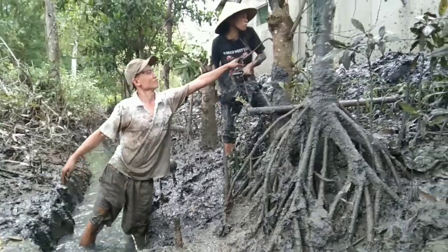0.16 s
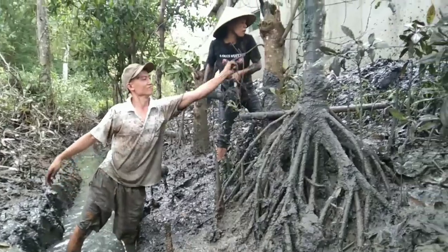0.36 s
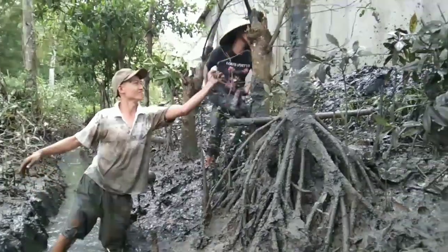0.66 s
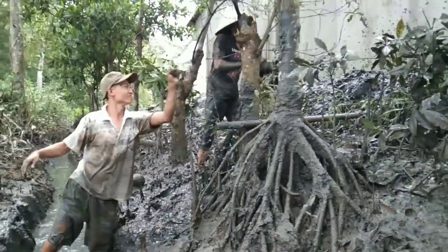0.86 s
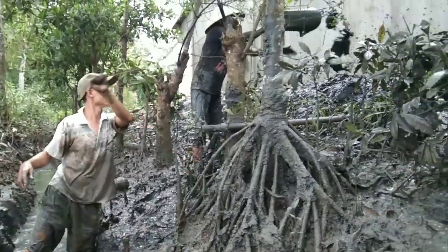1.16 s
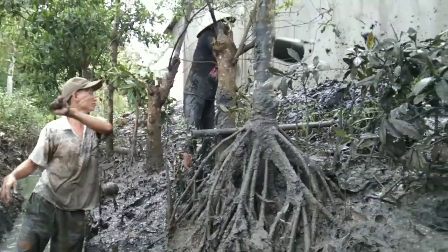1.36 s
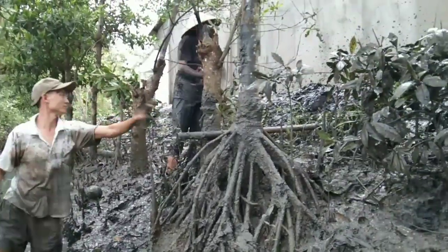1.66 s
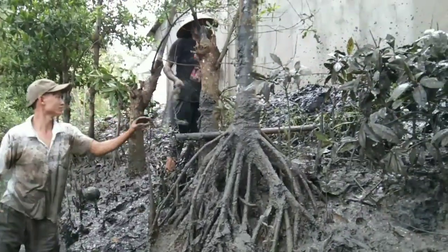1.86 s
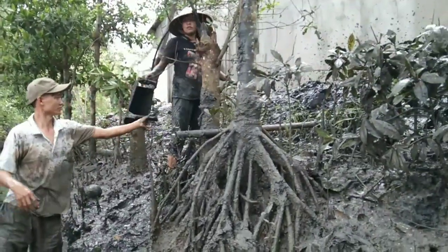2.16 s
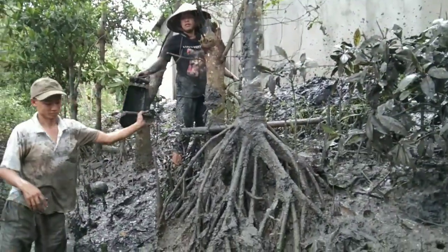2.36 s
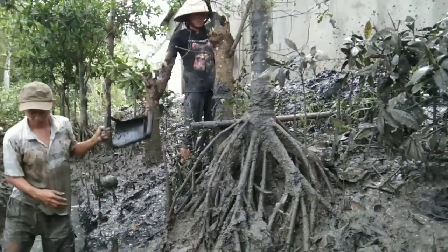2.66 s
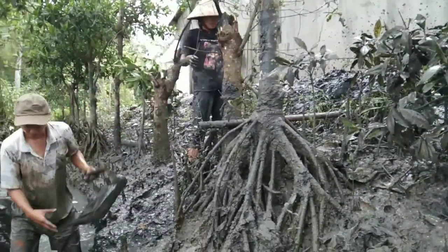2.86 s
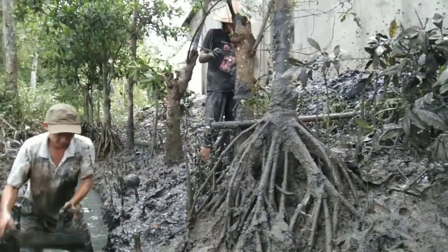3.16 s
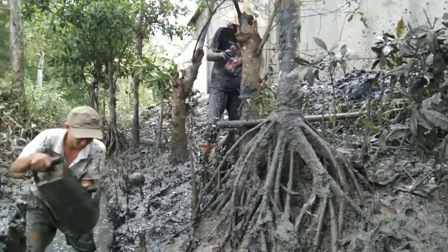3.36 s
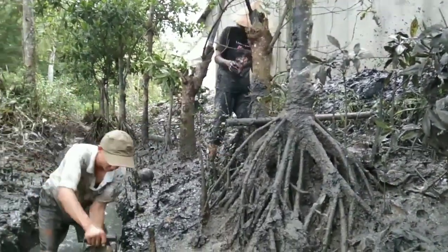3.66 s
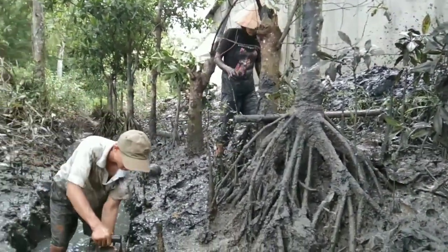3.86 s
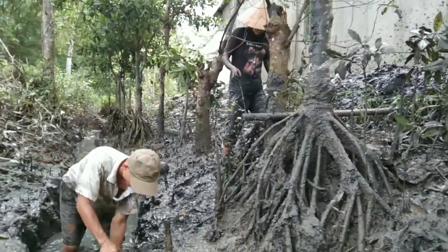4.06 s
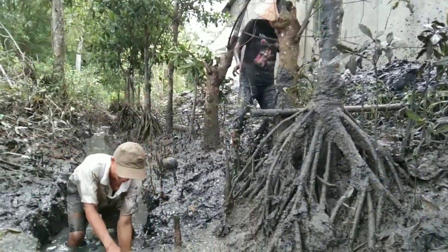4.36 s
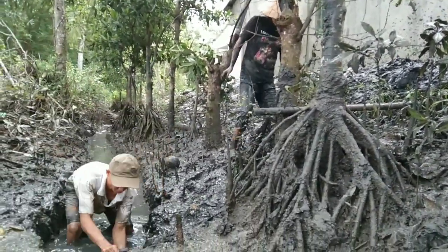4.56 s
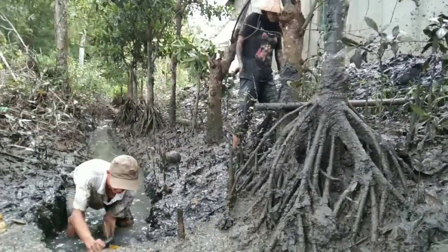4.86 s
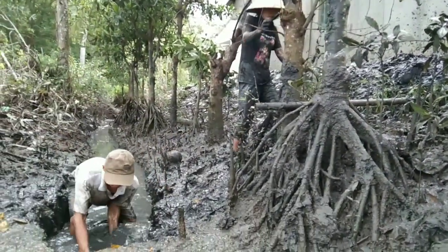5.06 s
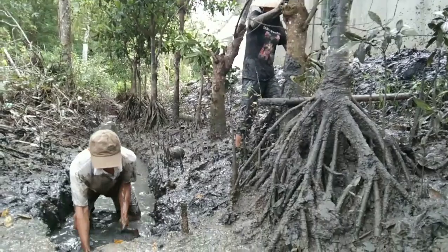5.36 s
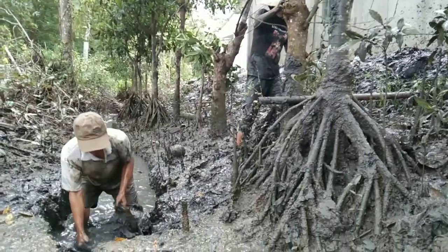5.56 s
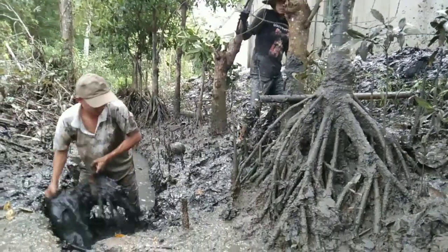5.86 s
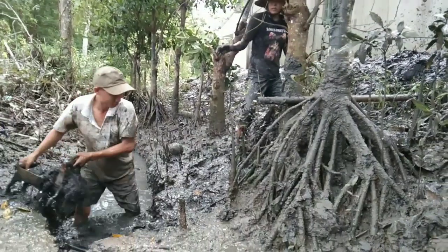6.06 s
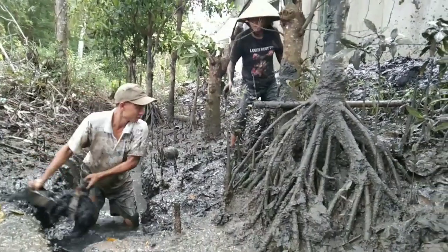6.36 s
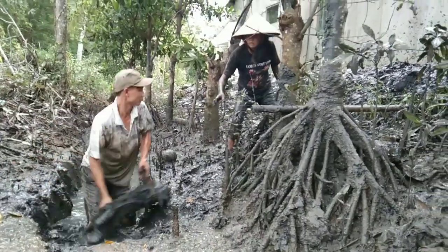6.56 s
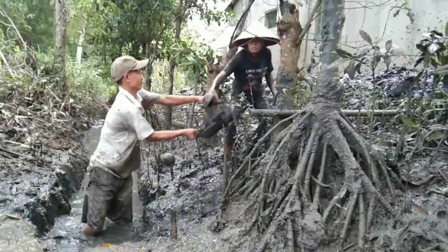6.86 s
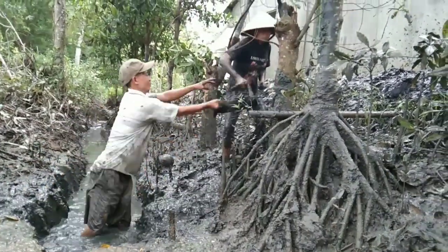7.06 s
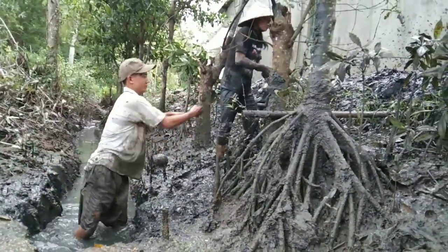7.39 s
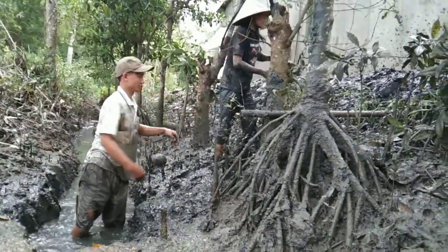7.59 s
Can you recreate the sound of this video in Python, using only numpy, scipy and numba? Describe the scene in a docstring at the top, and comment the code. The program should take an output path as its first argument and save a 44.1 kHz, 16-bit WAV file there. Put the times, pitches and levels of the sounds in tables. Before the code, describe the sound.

Muddy water sloshes, trickles and gurgles as someone wades and scoops, with sharp wet splats, plopping bubbles and a thin high insect trill outdoors.

```python
"""Wading and scooping in a muddy channel

Someone wades and scoops mud a few metres from a phone, among trees.
Swarms of ringing bubbles over noise make crackling spray, trickling water and gurgling mud; single gliding
rings plop, and noise bursts splat and tick. An insect, a modulated sine, trills in phrases
over brief hollow tones of narrow noise, a wavering low hum and a faint noise rumble."""
import sys
import numpy as np
from scipy import signal
from scipy.fft import rfft, irfft, next_fast_len
from scipy.io import wavfile
from scipy.ndimage import uniform_filter1d
from numba import njit

SR = 44100
rng = np.random.default_rng(int(sys.argv[2]) if len(sys.argv) > 2 else 0)


def to_wav(s):
    """Save 16-bit WAV."""
    ch = np.atleast_2d(s).T  # columns
    pcm = np.round(np.clip(ch, -1, 1) * 32767)  # PCM
    wavfile.write(sys.argv[1], SR, pcm.astype(np.int16))


def natural_amplitude(level_db):
    """Convert a level in decibels to a linear amplitude factor, elementwise."""
    exponent = np.asarray(level_db, float) / 20
    return 10 ** exponent


N = 340893
TIME = np.arange(N) / SR
# band edges shared by the water layers and the splats
SPRAY_HZ, TOP_HZ = 2700., 15600


@njit
def svf(x, hz, width):
    """State-variable band-pass, gain 1 at the centre."""
    y, b, l = np.empty(len(x)), 0., 0.
    g, k = np.tan(np.pi * hz / SR), width / hz
    for i in range(len(x)):
        v = (b + g * (x[i] - l)) / (1 + g * (g + k))
        b, l, y[i] = 2 * v - b, l + 2 * g * v, k * v
    return y


@njit
def rings(s, hz, t60, size, glide, rise):
    """Dying tones that swell over rise cycles; pitch climbs by the share glide over each t60."""
    out = np.zeros(N)
    for k in range(len(s)):
        start, n, phase = int(s[k] * SR), t60[k] * SR, 0.
        for i in range(min(int(n), N - start)):
            phase += 2 * np.pi * hz[k] * (1 + glide[k] * i / n) / SR
            swell = min(phase / (2 * np.pi * rise), 1.)
            out[start + i] += size[k] * np.sin(phase) * swell * 1000. ** (-i / n)
    return out


def level(x, db):
    """Set the rms in dB."""
    return x * natural_amplitude(db) / np.sqrt(np.mean(x ** 2))


def noise():
    """White noise."""
    return rng.standard_normal(N)


def walk(rate):
    """Random levels held 1 / rate s and slewed twice."""
    k = int(SR / rate)
    held = np.repeat(rng.standard_normal(N // k + 1), k)
    return uniform_filter1d(uniform_filter1d(held, k), k)[:N]


def coloured(x, lo_hz, hi_hz):
    """One steep-edged band of x, through the colour of the bank echo and the phone's port."""
    # colour of the bank echo and the port together: (frequency [Hz], gain [dB])
    colour = [(71, -34), (120, 1.5), (240, 1.5), (300, 4), (500, 1.5), (570, -3), (645, -20), (730, -4),
              (1020, 0.5), (1490, 1), (1870, 3), (2350, -1), (2800, -7.5), (3500, -9), (4200, -1.5),
              (4700, -2.5), (5200, -6.5), (5720, -7.5), (7400, -3), (8420, -2.5), (10500, -18),
              (15500, -34)]
    port_hz, port_width_hz, port_db = 4570., 250., 3.5  # a ring of the microphone port
    n = next_fast_len(N)
    f = np.fft.rfftfreq(n, 1 / SR) + 1  # 1 Hz up, to keep off zero
    hz, db = np.transpose(colour)
    edges = 1 / np.sqrt((1 + (lo_hz / f) ** 28) * (1 + (f / hi_hz) ** 28))
    ring_db = port_db / (1 + (2 * (f - port_hz) / port_width_hz) ** 2)
    gain = edges * natural_amplitude(np.interp(np.log(f), np.log(hz), db) + ring_db)
    return irfft(rfft(x, n) * gain, n)[:N]


def swarm(count, lo_hz, hi_hz, cycles, spread_db, glide, wash_db):
    """Many random bubbles of unlike size over a wash of those too small to tell apart."""
    when, pitch, size, length = rng.random((count, 4)).T
    hz = lo_hz * (hi_hz / lo_hz) ** pitch
    t60 = cycles * (.5 + length) / hz
    grains = rings(when * N / SR, hz, t60, hz * natural_amplitude(spread_db * size ** 2), glide * length, 1.5)
    return level(grains, 0) + natural_amplitude(wash_db) * noise()


def churn():
    """Bubble swarms follow the stirring; the finest mist and the heave of mud need hard stirring."""
    # brightness of the spray, in full in the mist and in part below it: (time [s], level [dB])
    mist_level = [(0, 6), (.6, 5.5), (1.2, 2), (1.85, 5), (2.35, -5), (2.7, -4), (3.2, 3), (3.75, 1),
                  (3.9, 1), (4.3, -5), (4.65, -7), (4.9, -2), (5.3, -2), (5.6, 1), (6.9, .5), (7.1, 4),
                  (7.7, 5)]
    mist_hz, tilt_hz = 10500., 5700.
    tilt_up, tilt_down = .3, .2  # share of the brightness gained above tilt_hz, lost below
    spray_db, *others = stirring()

    # small wavelets break in clusters, heard in every band at once; a heavy run-off evens them out
    lap_db = np.clip(-.13 * (spray_db + 28), .5, 3) * walk(20)
    trickle_db, gurgle_db, hollow_db = (db + lap_db for db in others)
    spray_db = spray_db + 0.37 * lap_db + 1.5 * walk(30)

    spray = swarm(count=16000, lo_hz=2600., hi_hz=15000., cycles=30., spread_db=12., glide=.1, wash_db=5.)
    trickle = swarm(count=8000, lo_hz=780., hi_hz=2800., cycles=32., spread_db=12., glide=.1, wash_db=6.)
    gurgle = swarm(count=4000, lo_hz=110., hi_hz=800., cycles=10., spread_db=8., glide=.4, wash_db=3.)

    bright_db = np.interp(TIME, *np.transpose(mist_level))
    low = coloured(spray, SPRAY_HZ, tilt_hz)
    high = coloured(spray, SPRAY_HZ, mist_hz) - low
    scale = natural_amplitude(-2.9) / np.std(low + high)
    low_gain = natural_amplitude(1.4 * walk(14) - tilt_down * bright_db)
    high_gain = natural_amplitude(1.2 * walk(11) + tilt_up * bright_db)
    out = scale * (low * low_gain + high * high_gain) * natural_amplitude(spray_db)

    # flying drops grow less than the spray does, the mist more
    out += drops(count=500) * natural_amplitude(.55 * (spray_db + 47))
    mist_db = 1.5 * (spray_db + 43) + bright_db + 2.2 * walk(12)
    out += level(coloured(spray, mist_hz, TOP_HZ), -66.8) * natural_amplitude(mist_db)
    out += level(coloured(trickle, 884.0, SPRAY_HZ), -3.1) * natural_amplitude(trickle_db + 0.6 * walk(12))
    out += level(coloured(gurgle, 85., 574.0), -5.26) * natural_amplitude(gurgle_db)
    heave = svf(svf(noise(), 82.0, 50.), 83.0, 60.)
    out += level(heave, -56) * natural_amplitude(1.5 * (gurgle_db + 39))
    return out + level(coloured(gurgle, 597.0, 1060.0), -6.5) * natural_amplitude(hollow_db)


def stirring():
    """Drive in dB of spray, trickle, gurgle and hollow slosh: powers of slow stirring and sloshes add."""
    # slow stirring of the water by legs, scoop and run-off:
    # (time [s], spray [dB], trickle [dB], gurgle [dB], hollow slosh [dB])
    slow_stirring = [(0, -48, -51, -59, -88), (.4, -49, -50, -70, -95), (.6, -47, -48, -60, -61),
                     (.8, -47, -51, -57, -85), (.95, -47, -51, -56, -70), (1.35, -46, -50, -57, -88),
                     (1.82, -48, -49, -57, -62), (1.97, -49, -51, -55, -95), (2.3, -50.5, -50, -62, -80),
                     (2.5, -51, -51, -61, -68), (2.72, -48.5, -49.5, -61, -95), (3.0, -46.5, -50, -59, -78),
                     (3.4, -47, -50.5, -56, -64), (3.6, -50, -50.5, -60, -90), (4.3, -50, -51, -56, -62),
                     (4.55, -49.5, -50, -58, -62), (4.65, -46, -46.5, -55, -57),
                     (4.85, -45.5, -46.5, -55, -56), (5.1, -45, -43, -41, -50), (5.25, -44, -41, -38, -48),
                     (5.35, -46, -44, -50, -49), (5.65, -44, -43, -48, -51), (5.9, -36, -38, -41.5, -42),
                     (6.2, -39, -42, -53, -54), (6.45, -40, -45, -54, -65), (6.62, -47, -52, -68, -87),
                     (7.05, -45.5, -51, -56.5, -80), (7.5, -48.5, -51.5, -62, -95),
                     (7.73, -47, -55, -60, -82)]
    # single sloshes: (peak time [s], swell over 20 dB [s], fade over 20 dB [s],
    # spray [dB], trickle [dB], gurgle [dB]); times hold before the crest is rounded
    single_sloshes = [(0, .05, .08, -46, -48, -56), (.13, .08, .15, -45, -45, -55),
                      (.26, .05, .12, -44, -46, -62), (.465, .01, .11, -32, -41.5, -62),
                      (.69, .12, .25, -45, -50, -58), (1.495, .12, .12, -32, -37.5, -47),
                      (1.67, .05, .15, -33.5, -41, -46), (1.745, .02, .13, -35, -41, -47),
                      (2.18, .25, .25, -43.5, -50, -60), (3.55, .05, .25, -44, -56, -62),
                      (3.74, .11, .12, -32, -36, -44), (3.93, .08, .1, -32.5, -33.5, -38),
                      (4.08, .15, .1, -39.5, -47, -55), (4.22, .1, .12, -45, -47, -51),
                      (4.35, .02, .15, -45, -46, -55), (4.5, .1, .1, -44, -46, -59),
                      (5.04, .15, .3, -41, -42, -39), (6.02, .15, .15, -40, -41, -52),
                      (6.13, .15, .2, -36, -41, -54), (6.24, .1, .15, -34, -37, -57),
                      (6.35, .1, .08, -36, -39, -62), (6.54, .2, .2, -40, -42, -62),
                      (6.69, .06, .5, -33, -35.5, -53), (6.8, .2, .3, -36, -41, -51),
                      (7.67, .2, .3, -45.5, -58, -67)]
    hollow_under_gurgle_db, round_s = 5.5, .008  # within a slosh; rounding of its crest
    s, *slow_db = np.transpose(slow_stirring)
    power = np.array([natural_amplitude(2 * np.interp(TIME, s, db)) for db in slow_db])
    for peak_s, swell_s, fade_s, spray_db, trickle_db, gurgle_db in single_sloshes:
        near = slice(int(max(peak_s - .5, 0) * SR), int((peak_s + 1) * SR))
        t = TIME[near] - peak_s
        t = t * abs(t) / (abs(t) + round_s)
        shape = natural_amplitude(2 * 20 * np.where(t < 0, t / swell_s, -t / fade_s))
        tops_db = np.array([spray_db, trickle_db, gurgle_db, gurgle_db - hollow_under_gurgle_db])
        power[:, near] += natural_amplitude(2 * tops_db)[:, None] * shape
    return 10 * np.log10(power)


def drops(count):
    """Scattered drops tick on mud and leaves: short dying noise bursts of unlike size."""
    t60_s, spread_db = .016, 4.
    hits = np.zeros(N)
    sizes_db = np.minimum(spread_db * rng.exponential(size=count), 13)
    hits[rng.integers(0, N, count)] = natural_amplitude(sizes_db)
    ticks = signal.lfilter([1], [1, -natural_amplitude(-60 / (t60_s * SR))], hits) * noise()
    return level(coloured(ticks, 2500., TOP_HZ), -57.5)


def splats():
    """A sharp wet crack of noise, then spatter dying more slowly; the body reaches down into the mud."""
    # wet slaps: (time [s], strength of the crack [dB], body against crack [dB])
    wet_slaps = [(.2535, -24, -29), (.4545, -1, -20), (.79, -35, -15), (.841, -34, -22), (.903, -42, 7),
                 (.95, -34, -12), (1.17, -36, -6), (1.205, -44, 7), (1.408, -29, -2), (1.4425, -31, -20),
                 (1.6497, -27, 2), (1.7339, -17, -22), (1.924, -28, -34), (2.175, -33, -15),
                 (2.24, -35, -12), (2.656, -34, -4), (2.892, -44, 6), (2.975, -43, 7), (3.043, -32, -8),
                 (3.0808, -35, 0), (3.1247, -33, -8), (3.169, -34, 2), (3.247, -30, -21),
                 (3.3386, -32, -12), (3.738, -24, -8), (3.895, -30, -7), (4.0022, -31, 5.5),
                 (4.07, -30, -25), (4.21, -30, -11), (4.348, -25, -22), (4.388, -33, -12), (4.495, -33, -6),
                 (4.741, -33, -2), (4.797, -32, -14), (4.9335, -31, 7), (5.0076, -24, -10),
                 (5.0508, -30, 3), (5.193, -32, 6), (5.7472, -30, 8), (6.235, -19.5, -20),
                 (6.343, -24, -15), (6.5282, -19.5, -9.5), (6.6733, -19, -11), (6.8504, -17, -18),
                 (7.4765, -34, -11), (7.6742, -26, -10)]
    crack, body, t = np.zeros(N + SR), np.zeros(N + SR), TIME[:SR // 2]
    for s, db, body_db in wet_slaps:
        # a slap rings longer the more body it has: .044 s where the body is 12 dB under
        t60 = .044 * natural_amplitude(.15 * (body_db + 12))
        near = slice(int(s * SR), int(s * SR) + len(t))
        # a bigger lump takes longer to spread
        rise = 1 - np.exp(-t / (.0003 + .0012 * natural_amplitude(db)))
        spatter = .14 * natural_amplitude(-60 * t / (3 * t60))
        crack[near] += natural_amplitude(db) * rise * (natural_amplitude(-60 * t / t60) + spatter)
        body[near] += natural_amplitude(db + body_db) * rise * natural_amplitude(-60 * t / (0.79 * t60))
    bright = level(coloured(noise(), 3300., TOP_HZ), -9)
    dull = level(coloured(noise(), 300., SPRAY_HZ), -9)
    return crack[:N] * bright + body[:N] * dull


def bubbles(count):
    """Each air pocket rings once, rising in pitch as it nears the surface, with a brood of short rings."""
    # bubbles that stand out: (time [s], level before swell and stutter [dB], nominal pitch [Hz])
    plops = [(.096, -36, 1670), (.456, -25.5, 2090), (.615, -34.5, 1754), (.634, -37, 1735),
             (.66, -39, 1250), (.684, -45, 503), (.905, -44, 310), (1.408, -31, 1960), (1.459, -40.5, 473),
             (1.473, -27, 2280), (1.59, -43.5, 400), (1.648, -37, 430), (1.651, -30, 2360),
             (1.785, -45, 224), (2.1, -41, 1990), (2.175, -40, 1900), (2.319, -40, 344), (2.423, -42, 510),
             (2.51, -39, 1840), (2.592, -39, 1900), (2.69, -38, 1580), (2.72, -39, 1600), (2.81, -41, 1800),
             (2.847, -40, 2380), (2.564, -38, 950), (2.654, -42, 438), (2.656, -36, 1070),
             (2.892, -44.5, 367), (3.081, -45.5, 382), (3.046, -38, 2340), (3.121, -34.5, 2420),
             (3.167, -43.5, 184), (3.424, -39, 1590), (3.46, -35, 1620), (3.683, -32, 1040),
             (3.713, -33, 1690), (3.873, -32.5, 2320), (3.875, -37, 203), (3.905, -30.5, 1040),
             (3.998, -40, 556), (4.002, -37, 1900), (4.191, -39, 450), (4.193, -34, 1820),
             (4.535, -30, 545), (4.632, -37, 1900), (4.756, -39.5, 345), (4.758, -37, 1800),
             (4.87, -37.5, 290), (4.877, -35, 1960), (4.907, -42, 304), (4.914, -33, 1140),
             (4.929, -28, 1384), (4.93, -31, 1950), (5.018, -35, 420), (5.024, -35, 290), (5.053, -34, 310),
             (5.05, -31, 2300), (5.111, -31, 1016), (5.132, -34, 325), (5.137, -33, 1020),
             (5.165, -37, 200), (5.17, -30, 1200), (5.215, -34, 290), (5.227, -30, 1227), (5.257, -32, 301),
             (5.275, -34, 470), (5.299, -31.5, 1056), (5.38, -36, 1380), (5.479, -41, 484),
             (5.412, -26, 230), (5.527, -35, 1190), (5.525, -40, 482), (5.581, -41, 493), (5.6, -39, 500),
             (5.604, -33, 1130), (5.654, -41, 493), (5.692, -38, 330), (5.712, -32, 1050),
             (5.735, -32, 1250), (5.75, -36, 471), (5.748, -25, 1300), (5.787, -29.5, 335),
             (5.81, -34, 330), (5.84, -37, 300), (5.864, -39.5, 444), (5.908, -27, 1320), (5.916, -33, 380),
             (5.94, -36, 400), (5.951, -22, 770), (5.96, -27, 830), (5.969, -23.5, 1034),
             (6.053, -28, 2100), (6.058, -32, 1060), (6.407, -31, 1470), (6.286, -28, 1270),
             (6.321, -28, 2700), (6.325, -30, 1850), (6.525, -27, 1670), (6.58, -34, 2820),
             (6.674, -27.5, 1780), (6.701, -23.5, 1208), (6.719, -28, 1040), (6.826, -26, 1336),
             (6.978, -33, 2300), (7.042, -41, 1680), (7.105, -40, 1840), (7.135, -37, 1500),
             (7.206, -39, 1220), (7.305, -38, 1040), (7.508, -37, 1960)]
    surface_hz = 700  # lower bubbles are pockets in the mud, higher ones sit at the surface
    slack_hz = 380.  # pockets below this are slack and die sooner
    ragged_per_s = 500  # silt and froth make a ring stutter
    # a bursting bubble sets off smaller ones: level, spread of pitch, spread of time
    brood_db, brood_octaves, brood_s = -10, .45, .016
    # (t60 [s], pitch rise [share], swell [cycles], depth of the stutter [dB])
    pocket, surface = (.07, .2, 1.1, .8), (.047, .22, 3.0, 2.5)

    s, db, hz = np.transpose(plops)
    u = rng.standard_normal((len(s), count, 3)).T
    out = 0
    for kind, settings in ((hz < surface_hz, pocket), (hz >= surface_hz, surface)):
        t60, glide, rise, ragged_db = settings
        same = np.ones(kind.sum())
        t60 = t60 * np.minimum(hz[kind] / slack_hz, 1) ** .8
        main = rings(s[kind], .96 * hz[kind], t60 * same, natural_amplitude(db[kind]), glide * same, rise)
        out = out + main * natural_amplitude(-ragged_db * abs(walk(ragged_per_s)))
        for late, octaves, size in u.transpose(1, 0, 2)[:, :, kind]:
            start = s[kind] + brood_s * abs(late)
            pitch = hz[kind] * 2 ** (brood_octaves * abs(octaves))
            sizes = natural_amplitude(db[kind] + brood_db + 3.0 * size)
            out += rings(start, pitch, .45 * t60 * same, sizes, glide * same, .3)
    # the echo off the water cancels much of one pitch
    return out - .8 * svf(out, 645., 110.)


def insect():
    """A thin wavering sine whose level buzzes and throbs within each phrase."""
    # insect phrases: (start [s], end [s], level [dB])
    phrases = [(0, 0.81, -54), (0.987, 2.045, -57), (2.303, 3.21, -53.5), (3.39, 4.11, -53),
               (4.293, 5.094, -55), (5.38, 6.25, -58), (6.548, 7.386, -50), (7.62, 7.724, -47.5)]
    trill_hz, buzz_hz, throb_hz = 8640., 46., 15.3  # trill and buzz waver about theirs
    gate = sum(natural_amplitude(db) * ((TIME >= a) & (TIME < b)) for a, b, db in phrases)
    throb = 1 + 0.41 * np.sin(2 * np.pi * throb_hz * TIME)
    buzz_rate = buzz_hz * (1 + 0.097 * walk(4.6))
    buzz = 1 + 0.45 * np.sin(2 * np.pi * np.cumsum(buzz_rate) / SR)
    tone = np.sin(2 * np.pi * np.cumsum(trill_hz + 35 * walk(70)) / SR) * natural_amplitude(1.0 * walk(40))
    return level(tone * throb * buzz, 0) * uniform_filter1d(gate, size=900)  # softened phrase ends


def hoot():
    """Faint hollow tones: narrow bands of noise that swell and fade."""
    # hollow tones: (start [s], end [s], centre [Hz], width of the first filter [Hz],
    # level before the swell [dB])
    hollow_tones = [(1.1, 1.42, 495, 50, -66), (1.78, 1.9, 485, 50, -62), (1.95, 2.32, 499, 60, -60)]
    out = 0
    for start, end, hz, width_hz, db in hollow_tones:
        swell = np.sin(np.pi * np.clip((TIME - start) / (end - start), 0, 1)) ** .5
        band = svf(svf(noise(), hz, width_hz), hz, 2. * width_hz)
        out = out + level(band, db) * swell * natural_amplitude(4.0 * walk(15))
    return out


def drone():
    """A wavering sine hum that swells and sinks, likely a far motor, over a rumble of low noise."""
    # level of the hum before its random flutter: (time [s], level [dB])
    hum_level = [(0, -60), (.5, -66), (1.5, -66), (1.8, -61), (3.2, -63), (5.0, -63), (6.2, -64),
                 (6.5, -72), (7.0, -60), (7.73, -62)]
    hum_hz, waver_hz, rumble_hz = 98.5, 2.5, 95.5
    hum = level(np.sin(2 * np.pi * np.cumsum(hum_hz + waver_hz * walk(12)) / SR), 0)
    hum = hum * natural_amplitude(np.interp(TIME, *np.transpose(hum_level)) + 3.0 * walk(14))
    rumble = svf(svf(noise(), rumble_hz, 105.0), 0.82 * rumble_hz, 87.0)
    return hum + level(rumble, -63)


def scene():
    """Water, mud, insect, hollow tones and drone; splats and plops scatter off trunks and banks."""
    wet = splats() + bubbles(count=3)
    t = TIME[:6000]
    scatter = level(rng.standard_normal(len(t)) * natural_amplitude(-60 * t / 0.15), -48.5)
    echo = signal.fftconvolve(wet, scatter)[:N]
    return (churn() + wet + echo + insect() + hoot() + drone())[None]


def band_limit(x):
    """A steep low-pass at the top of the band."""
    return signal.sosfilt(signal.butter(12, 16480, fs=SR, output="sos"), x)


def record(dry):
    """The phone cuts the top with a steep low-pass."""
    low_pass = signal.ellip(8, .2, 60, TOP_HZ, fs=SR, output="sos")
    mix = signal.sosfilt(low_pass, dry)
    return band_limit(mix)


dry = scene()
out = record(dry)
to_wav(out)
```